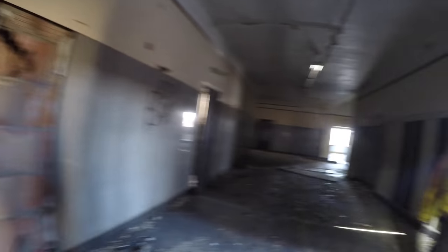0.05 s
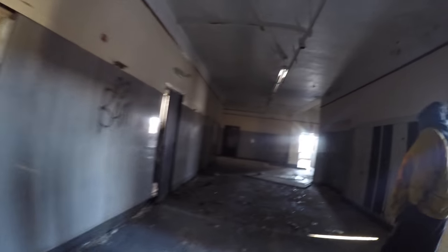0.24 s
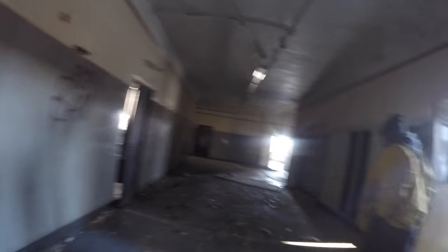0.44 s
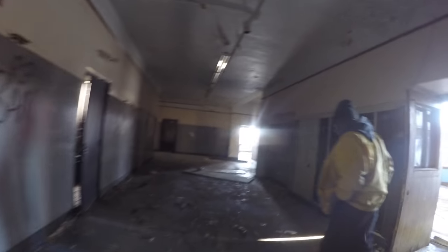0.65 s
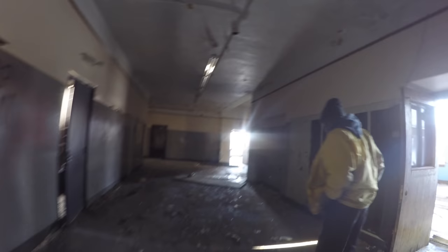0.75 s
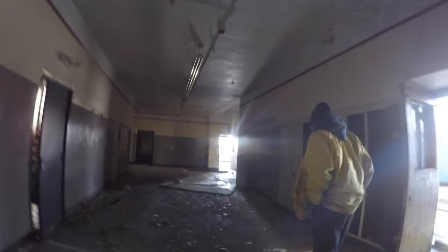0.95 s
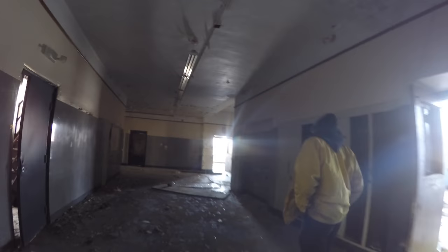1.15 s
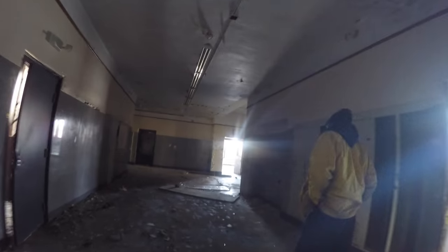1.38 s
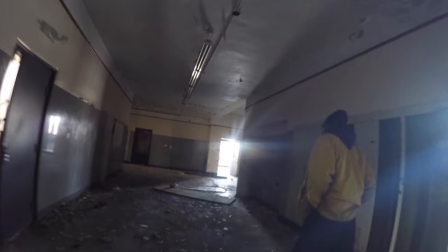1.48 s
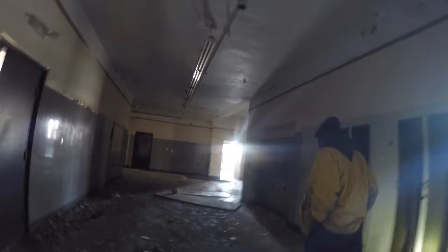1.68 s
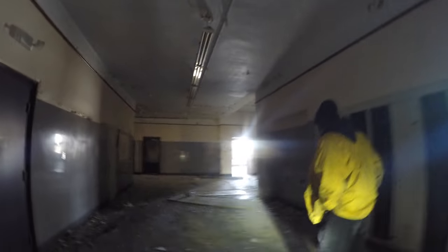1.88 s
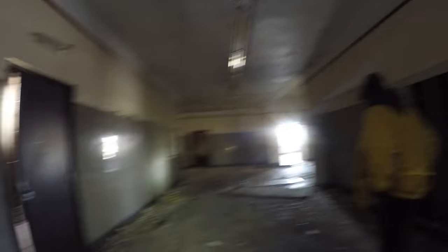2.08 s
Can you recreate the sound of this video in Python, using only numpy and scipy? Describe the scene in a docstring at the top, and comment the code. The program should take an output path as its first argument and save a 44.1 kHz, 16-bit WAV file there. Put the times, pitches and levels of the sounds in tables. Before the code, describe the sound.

Footsteps on brittle debris: a loud burst of crunching and sharp glassy snaps at 0 seconds, more crackles until about 0.45, their bright echo ringing over a second in a bare corridor. A hollow click cluster comes near 0.92. From about 1.15 to 2 seconds, dull heavy thumps, knocks and low rumble shake the handheld microphone, over faint scuffs, small ticks near 1.6 and 1.75, and quiet air.

```python
"""A long bare corridor that rings for over a second, heard from a hand-held camera's microphone.
Feet crunch over plaster and glass litter: clumped random grains, filtered in third-octave bands.
Single shards snap out of the crunch as bell-shaped bursts; decaying noise tails make the hall's echo.
At the camera, jolts and knocks are lower bursts over a flickering rumble of filtered noise; still air lies behind."""
import sys
import numpy as np
from scipy import signal
from scipy.fft import rfft, irfft
from scipy.io import wavfile
from scipy.ndimage import uniform_filter1d

SR = 44100
rng = np.random.default_rng(int(sys.argv[2]) if len(sys.argv) > 2 else 0)


def master_out(mix):
    """Clip the mix to full scale and print it as 16-bit PCM to the path in sys.argv[1]."""
    frames = np.transpose(np.atleast_2d(mix))
    ceiling = np.clip(frames, -1, 1)
    pcm = np.round(ceiling * 32767).astype(np.int16)
    wavfile.write(sys.argv[1], SR, pcm)


N = 93536
T = np.arange(N) / SR  # time [s]

# Spectrum of the still air: (frequency [Hz], relative level [dB per Hz])
AIR_SPECTRUM = [(180, -20), (300, -12), (685, -26.5), (1160, -19), (2100, -35), (4720, -37.5), (15500, -54)]
# Spectrum of the low buffeting: (frequency [Hz], relative level [dB per Hz])
RUMBLE_SPECTRUM = [(12, -50), (20, 0), (59, -5), (90, -9.5), (200, -24), (400, -43), (700, -44.5),
                   (1320, -120)]
# Rumble level before its flicker: (time [s], level [dB])
RUMBLE_LEVEL = [(0.0, -39), (0.15, -36.5), (0.57, -35.5), (0.801, -32), (1.1, -29), (1.22, -29.5),
                (1.322, -17), (1.52, -22), (1.6, -28), (1.75, -23.5), (1.9, -20), (2.02, -26), (2.12, -28)]
# Jolts of the camera: (centre time [s], peak level [dB], pitch [Hz], length [cycles])
CAMERA_JOLTS = [(.186, -22, 67, 1.02), (.262, -25, 112, 0.58), (.335, -22, 65, 0.56),
                (.48, -30.5, 204, 0.72), (.54, -23, 47, 1.9), (.635, -23.5, 48.3, 0.41),
                (.77, -18, 76, 0.77), (.825, -22, 97, 1.7), (.857, -22.5, 136, 0.61),
                (.895, -23, 107, 0.59), (.938, -15, 85, 0.74), (.96, -19.5, 46, 0.94), (.995, -23, 90, 1.1),
                (1.058, -17, 93, 1.25), (1.078, -22, 115, 1.3), (1.148, -36, 81, 0.43),
                (1.157, -10, 45.4, 0.85), (1.159, -8.5, 90.7, 1.3), (1.174, -6.5, 90, 0.93),
                (1.188, -23, 80, 0.83), (1.255, -15, 110, 0.68), (1.27, -18, 81, 0.39),
                (1.295, -13.5, 94.3, 0.91), (1.325, -8.5, 79, 1.4), (1.379, -6, 81, 0.65),
                (1.41, -19.5, 70, 1.4), (1.447, -11.5, 63.8, 1.77), (1.503, -13.5, 140, 0.98),
                (1.525, -22, 101, 1.1), (1.557, -27, 170, 1.1), (1.63, -15, 84, 1.1),
                (1.645, -22, 150, 0.53), (1.667, -14.5, 74.4, 1.94), (1.71, -34, 70, 1.6),
                (1.796, -19, 176, 0.55), (1.83, -19, 150, 0.5), (1.846, -9, 102, 0.5), (1.90, -16, 67.7, 3),
                (1.95, -8.5, 70, 0.86), (1.968, -13.5, 129.6, 0.42), (1.985, -20, 78, 1.2),
                (2.05, -21, 71, 1.3)]
# Sharp knocks on the camera body: (centre time [s], peak level [dB], pitch [Hz])
CAMERA_KNOCKS = [(.935, -27.5, 397), (1.061, -30.5, 217), (1.174, -24, 213), (1.256, -32, 260),
                 (1.3193, -25.5, 417), (1.326, -9.5, 194), (1.379, -27.5, 280), (1.435, -28.5, 249),
                 (1.456, -26, 218), (1.475, -22.5, 236), (1.504, -26, 270), (1.796, -42, 342),
                 (1.83, -36, 310), (1.847, -28.5, 276), (1.903, -25, 170), (1.967, -30.5, 280)]
# Time the corridor takes to die by 60 dB: (frequency [Hz], decay time [s])
HALL_DECAY = [(500, 1.37), (1320, 1.674), (3480, 1.15), (7000, 0.67), (12000, 0.58)]
# Shards snapping: (centre time [s], peak level [dB], pitch [Hz])
SHARD_SNAPS = [(.0035, -3, 1590), (.0098, -4.5, 4870), (.0145, -32, 1410), (.0175, -11, 6230),
               (.0185, -15, 2200), (.022, -7, 2470), (.028, -22, 1540), (.094, -12, 1440),
               (.105, -18, 1250), (.1535, -11.5, 1760), (.112, -17.5, 6940), (.135, -16.5, 6940),
               (.168, -16.5, 5900), (.256, -20, 6150), (.262, -12, 2340), (.277, -15, 2210),
               (.323, -15, 1320), (.347, -11, 1300), (.385, -15, 1190), (.870, -34, 3550),
               (.873, -26, 3570), (.9075, -10.5, 1105), (.9135, -23.5, 1250), (.9225, -7.5, 1167),
               (.9265, -30, 1220), (.9305, -18, 1210), (.935, -21, 1010), (.9425, -22.5, 1250),
               (.949, -33, 1130), (.955, -38, 1150), (.96, -22, 1300), (.965, -24.5, 1210),
               (0.994, -30, 1140), (1.188, -30, 1200), (1.436, -26.5, 600), (1.474, -28, 1150),
               (1.4742, -43, 2200), (1.509, -43, 1300), (1.610, -22, 2210), (1.6106, -30.5, 4200),
               (1.622, -33, 2370), (1.632, -23.5, 2270), (1.638, -30, 2150), (1.645, -31, 2060),
               (1.724, -24.5, 2900), (1.738, -32.5, 3000), (1.747, -26, 2800), (1.757, -24, 3300),
               (2.009, -32, 1280)]
# Colour of the litter: (frequency [Hz], gain [dB])
LITTER_COLOUR = [(240, -12), (400, -9.5), (520, -9), (1120, 3.5), (2290, 0), (4500, -8), (7100, -15),
                 (10700, -25), (15500, -37)]
# Footfalls and scuffs: (start time [s], length [s], level before litter colour [dB],
# brightness about 1500 Hz [dB per octave], share of the length spent rising [0-1],
# level sent to the hall, relative to direct [dB])
FOOTFALLS = [(0.0, 0.07, -22, 0.5, 0.14, -3), (0.024, 0.093, -36, 3, 0.31, -11),
             (0.077, 0.096, -32.5, 2.5, 0.43, -3.5), (0.146, 0.043, -29, 1.5, 0.53, 2),
             (0.238, 0.048, -24.5, 1, 0.43, -1.5), (0.318, 0.034, -26.5, -0.5, 0.34, -3),
             (0.336, 0.045, -30, 4, 0.45, -0.5), (0.366, .13, -32.5, 0.5, 0.37, -1.5),
             (0.781, 0.15, -54.5, 3.5, 0.41, -0.5), (0.859, 0.036, -44, 1.5, 0.56, 5),
             (0.895, 0.11, -47.5, 3.5, 0.37, -9), (1.004, 0.14, -64, 5.5, .4, -7),
             (1.098, 0.13, -58, 3.5, 0.37, -5), (1.422, 0.053, -57, -8, 0.57, -9),
             (1.431, .13, -52.5, 2.5, 0.52, 0.5), (1.54, 0.21, -56.5, 3.5, 0.41, 2.5),
             (1.663, 0.21, -48.5, 6, 0.43, -4), (1.71, 0.049, -51, -13.5, .45, -7.5),
             (1.836, 0.096, -61, 5.5, 0.28, 7.5), (1.983, 0.063, -52, 3, 0.37, 0),
             (1.974, 0.21, -46, 2, 0.39, -3.5)]

AIR_DB = -49
RUMBLE_FLICKER_DB, RUMBLE_FLICKER_HZ = -1, 7.7
KNOCK_CYCLES = 1
HALL_DB, SNAP_HALL_DB = 2.5, -7.5  # echo gain; share of the snaps sent to the hall
HALL_DELAY_S = 0.0016  # time constant of the echo's onset
EARLY_DB, EARLY_S = -9.5, 0.01  # the near walls answer first and louder
TAIL_CHANGE_S = 0.2  # a new random tail this often, so that no fixed tones stand out in the ring
SNAP_CYCLES, SNAP_LAW = 1.047, 0.37  # length at 1200 Hz; thin high shards ring for more cycles
SNAP_EDGE_DB = -24  # thin crack at up to three times the pitch, relative to the snap
GRAINS_PER_CYCLE, GRAIN_SCATTER_DB = 0.8, 2.0  # mean grain rate per band-centre cycle; level spread
GRIT_DB, GRIT_HZ = 2.5, 150  # grains come in clumps: depth and rate
TOP_HZ = 15350


def undb(db):
    """Turn decibels into an amplitude factor."""
    return 10 ** (np.asarray(db) / 20)


def on_log(table, hz):
    """Read a table along log frequency."""
    points = np.array(table, float)
    return np.interp(np.log(np.maximum(hz, 1)), np.log(points[:, 0]), points[:, 1])


def colour(x, table):
    """Filter a signal by the spectrum of the table."""
    hz = np.arange(N // 2 + 1) * SR / N
    return irfft(rfft(x) * undb(on_log(table, hz)), N)


def coloured_noise(table):
    """White noise filtered by the table, at rms 1."""
    noise = colour(rng.standard_normal(N), table)
    return noise / np.sqrt(np.mean(noise ** 2))


def walk(rate_hz):
    """Smooth random wander, spread 1: noise averaged twice over 1 / rate_hz."""
    width = int(SR / rate_hz)
    wander = uniform_filter1d(uniform_filter1d(rng.standard_normal(N), width), width)
    return wander / wander.std()


def third_octave(x, hz):
    """Third-octave band around hz."""
    edges = [hz / 2 ** (1 / 6), hz * 2 ** (1 / 6)]
    return signal.sosfilt(signal.butter(2, edges, "band", fs=SR, output="sos"), x)


def wavelets(rows):
    """Short bell-shaped bursts of a few cycles."""
    out = np.zeros(N)
    for centre, db, hz, cycles in rows:
        turns = (T - centre) * hz
        bell = np.exp(-2 * (turns / cycles) ** 2)
        out -= undb(db) * bell * np.cos(2 * np.pi * turns)
    return out


def still_air():
    """Steady faint noise with the spectrum of the still air."""
    return undb(AIR_DB) * coloured_noise(AIR_SPECTRUM)


def rumble():
    """Low buffeting of the camera: noise whose level follows a slow course and flickers."""
    points = np.array(RUMBLE_LEVEL)
    course_db = np.interp(T, points[:, 0], points[:, 1])
    noise = coloured_noise(RUMBLE_SPECTRUM)
    flicker_db = RUMBLE_FLICKER_DB * walk(RUMBLE_FLICKER_HZ)
    return noise * undb(course_db + flicker_db)


def camera_jolts():
    """Deep thumps as the hand-held camera is jolted, each a brief low-pitched swing."""
    return wavelets(CAMERA_JOLTS)


def camera_knocks():
    """Sharp knocks on the camera body, short bursts pitched mostly above the jolts."""
    return wavelets([(centre, db, hz, KNOCK_CYCLES) for centre, db, hz in CAMERA_KNOCKS])


def hall_tail():
    """One echo of the corridor: noise that swells in quickly and loses its treble first."""
    hz, t, cells = signal.stft(rng.standard_normal(SR * 3 // 2), SR, nperseg=256)
    decay = undb(-60 * t / on_log(HALL_DECAY, hz)[:, None])
    tail = signal.istft(cells * decay, SR)[1]
    t = T[:len(tail)]
    onset = 1 - np.exp(-t / HALL_DELAY_S)
    near_walls = 1 + undb(EARLY_DB) * np.exp(-t / EARLY_S)
    return tail * onset * near_walls / np.sqrt(SR * 0.1)


def hall(x):
    """The corridor's ring: each stretch of sound convolved with a new random echo tail."""
    out, hop = np.zeros(N), int(TAIL_CHANGE_S * SR)
    for i in range(0, N, hop):
        wet = signal.fftconvolve(x[i:i + hop], hall_tail())[:N - i]
        out[i:i + len(wet)] += wet
    return undb(HALL_DB) * out


def shard_snaps():
    """Shards cracking: a brief ring at the shard's pitch plus a thin crack above it."""
    rings = [(centre, db, hz, SNAP_CYCLES * (hz / 1200) ** SNAP_LAW) for centre, db, hz in SHARD_SNAPS]
    edges = [(centre, db + SNAP_EDGE_DB, min(3 * hz, 12000), 1.5) for centre, db, hz in SHARD_SNAPS]
    return wavelets(rings) + wavelets(edges)


def litter_grains(hz):
    """Random clicks of either sign at rms 1, more frequent in higher bands, with scattered levels."""
    chance = rng.random((3, N))
    struck = chance[0] < GRAINS_PER_CYCLE * hz / SR
    sign = np.sign(chance[1] - 0.5)
    size = undb(-GRAIN_SCATTER_DB * np.log(chance[2] + 0.002))
    grains = struck * sign * size
    return grains / np.sqrt(np.mean(grains ** 2))


def crunch():
    """Clumped grains of broken litter, each step with its own brightness: direct sound and hall send."""
    shapes = []  # power of each footfall over time
    for start, length, _, _, rise, _ in FOOTFALLS:
        progress = np.clip((T - start) / length, 0, 1)
        bend = np.log(0.5) / np.log(np.clip(rise, 0.05, 0.9))  # puts the peak at the end of the rise
        shapes.append(np.sin(np.pi * progress ** bend) ** 4)
    shapes = np.array(shapes)
    rows = np.array(FOOTFALLS)
    level_db, tilt_db, send_db = rows[:, 2], rows[:, 3], rows[:, 5]
    grit = undb(GRIT_DB * walk(GRIT_HZ))
    out = np.zeros((2, N))
    for hz in 350 * 2 ** (np.arange(17) / 3):
        direct_db = level_db + tilt_db * np.log2(hz / 1500)
        power = undb(2 * np.array([direct_db, direct_db + send_db]))
        level = np.sqrt(power @ shapes)  # footfalls add as powers
        out += third_octave(litter_grains(hz) * grit * level, hz) * np.sqrt(SR / 4000)
    return colour(out, LITTER_COLOUR)


def scene():
    """Snaps and crunch heard direct, with the corridor's ring, over the camera noise and still air."""
    snaps = shard_snaps()
    litter, litter_send = crunch()
    echo = hall(litter_send + undb(SNAP_HALL_DB) * snaps)
    camera = camera_jolts() + camera_knocks() + rumble()
    return (litter + snaps + echo + camera + still_air())[None]


def record(dry):
    """The camera cuts the top: a steep low-pass at TOP_HZ."""
    return signal.sosfilt(signal.ellip(10, 0.2, 80, TOP_HZ, fs=SR, output="sos"), dry)


dry = scene()
out = record(dry)
master_out(out)
```